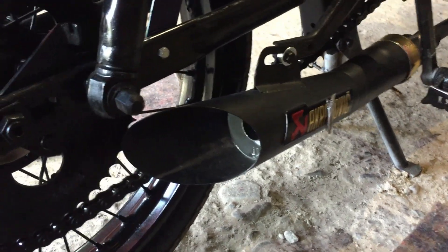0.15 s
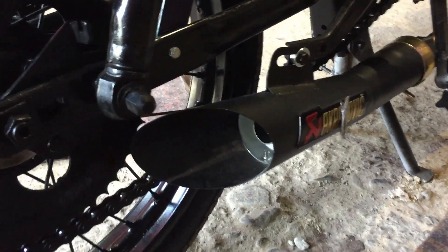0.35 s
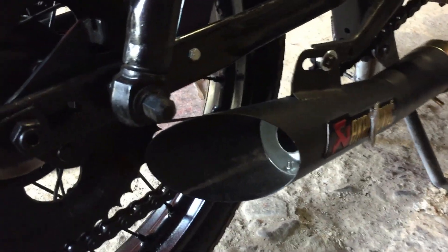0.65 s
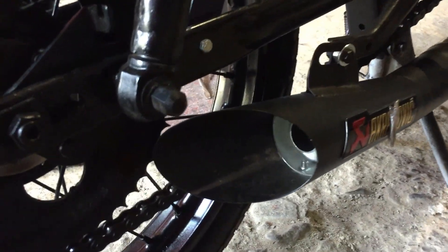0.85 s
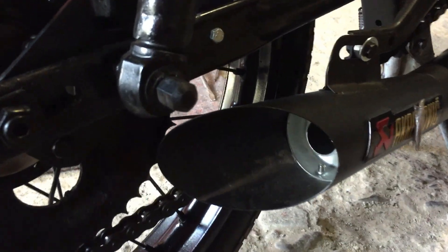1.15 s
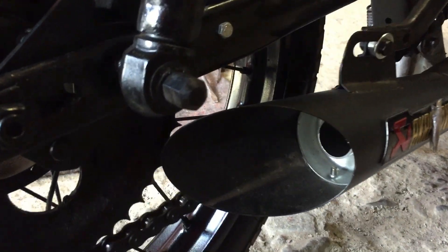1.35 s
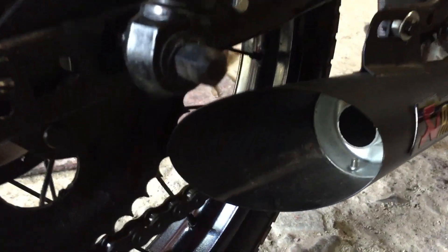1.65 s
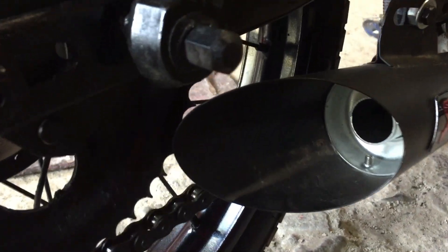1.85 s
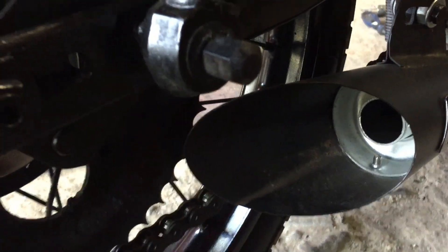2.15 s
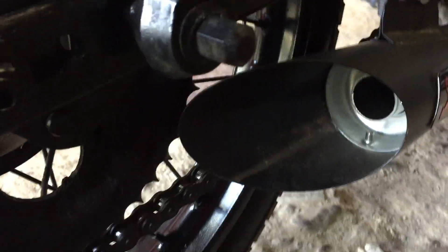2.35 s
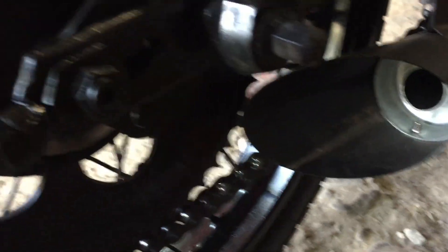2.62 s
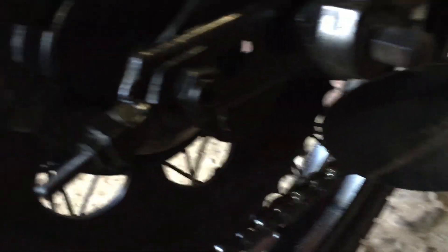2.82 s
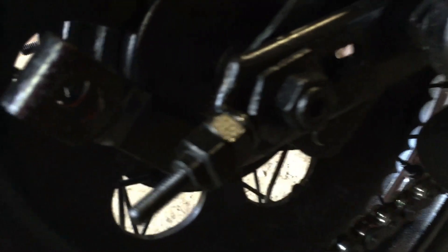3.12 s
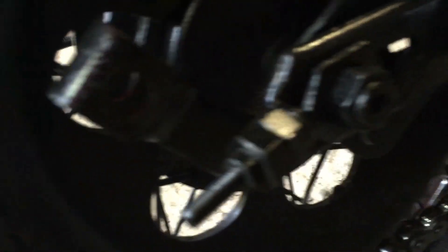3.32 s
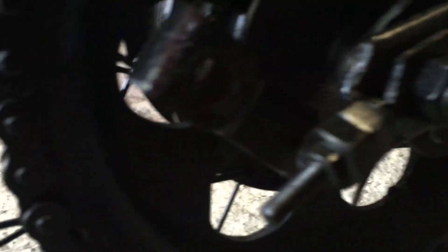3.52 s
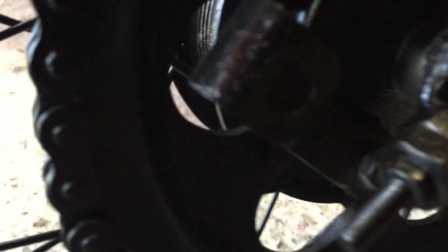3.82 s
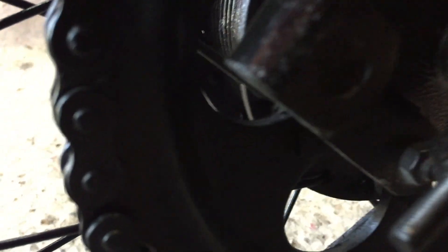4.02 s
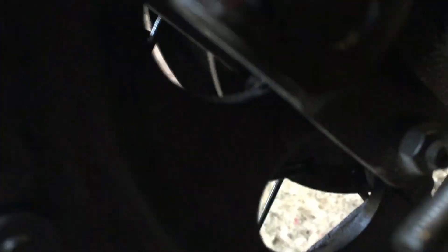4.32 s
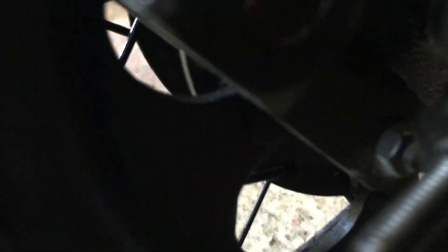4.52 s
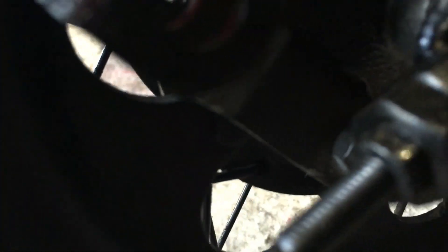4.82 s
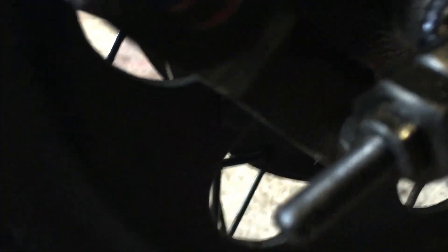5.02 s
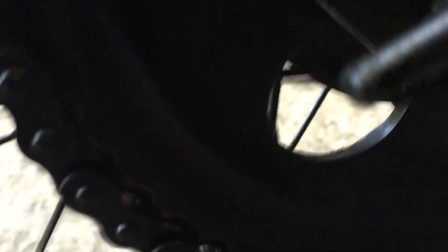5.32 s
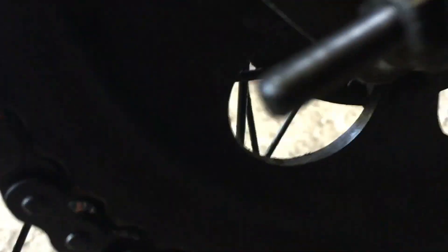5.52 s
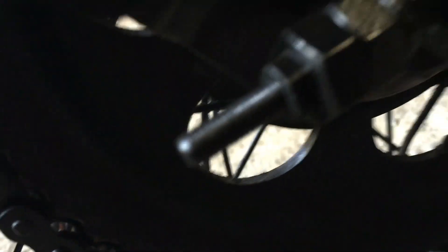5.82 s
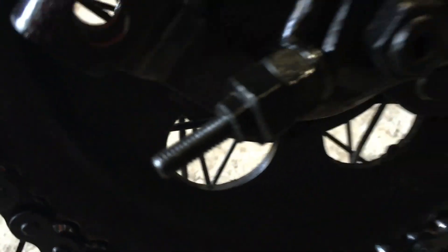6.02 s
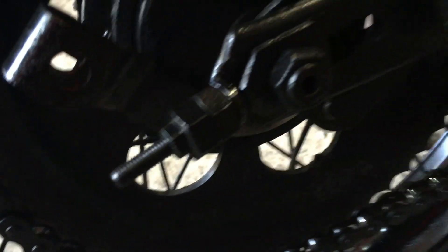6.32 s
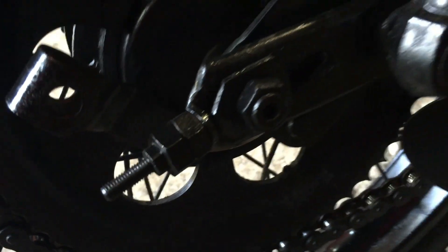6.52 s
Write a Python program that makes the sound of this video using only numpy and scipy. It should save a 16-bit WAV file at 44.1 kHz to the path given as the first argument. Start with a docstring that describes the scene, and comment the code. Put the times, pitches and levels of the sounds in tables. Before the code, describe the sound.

Close, sputtering moped idle: hard dry exhaust cracks, hollow can ring and brief gulping misses over soft gas hiss and mechanical whirr.

```python
"""Bangs and pops from a two-stroke moped idling in a garage, about 37 turns a second, over hiss and whirr.
Every few turns it misses, then catches with a bang. Each firing spits a jet from the outlet, rings the
silencer, jolts the frame and pushes out two puffs of gas; a missed turn gulps, with a faint ring and puff.
The microphone moves from the outlet past the axle to the rear sprocket and back past the axle,
and the hardest pops overload it."""
import sys
import numpy as np
from scipy import signal
from scipy.fft import rfft, irfft
from scipy.io import wavfile

SR = 44100
rng = np.random.default_rng(int(sys.argv[2]) if len(sys.argv) > 2 else 0)


def inscribe(sig):
    """Save sig as 16-bit PCM at rate SR to the path in sys.argv[1].

    A 1-D sig is mono; a 2-D sig holds one channel per row.
    Samples are clipped to [-1, 1] before scaling.
    """
    pcm = np.round(np.clip(np.atleast_2d(sig).T, -1, 1) * 32767)
    wavfile.write(sys.argv[1], SR, pcm.astype(np.int16))


N = 293706
TIME = np.arange(N) / SR  # the whole scene [s]
AGE = np.arange(2048) / SR  # time since one event [s]
BINS_HZ = abs(np.fft.fftfreq(4096, 1 / SR))
IDLE_HZ = 37
EDGE_HZ = 16250  # top of the microphone's band

# the louder bangs, most of them as the engine catches after a miss:
# (time [s], force [dB], turns missed just before [count])
BANGS = [(0.0192, -1.5, 0), (0.0726, -1.5, 0), (0.1271, -1.5, 1), (0.2109, -1.3, 2), (0.265, -1.4, 0),
         (0.318, -1.5, 0), (0.3724, -4, 1), (0.4818, -2, 2), (0.508, -1.4, 0), (0.5857, -4.5, 1),
         (0.6636, -1.5, 0), (0.715, -5, 1), (0.743, -2.2, 0), (0.8245, -1.2, 2), (1.012, -1.8, 2),
         (1.149, -1.83, 2), (1.2585, -1.5, 2), (1.3127, -1.3, 1), (1.392, -2.6, 1), (1.4716, -3, 1),
         (1.5262, -7, 1), (1.6604, -3, 2), (1.8183, -0.83, 2), (1.8998, -2, 1), (1.9791, -2.5, 1),
         (2.0866, -0.35, 2), (2.1422, -1.3, 1), (2.198, -1.5, 1), (2.2812, -3.5, 1), (2.3887, 0.4, 2),
         (2.4974, 0.46, 2), (2.5532, -1.04, 1), (2.746, -1, 2), (2.909, -3, 2), (2.9648, -4.5, 1),
         (3.0471, -1.2, 1), (3.1273, -5, 1), (3.2655, -5.5, 1), (3.2948, -1.6, 0), (3.3527, -4, 1),
         (3.4099, -0.96, 1), (3.4977, -1.5, 1), (3.6127, -2.5, 1), (3.669, -2, 1), (3.726, -1, 1),
         (3.8397, -4.5, 1), (3.9754, -2, 1), (4.0292, -2.5, 1), (4.166, -1.5, 2), (4.249, -5, 1),
         (4.3589, -2.5, 2), (4.413, -0.7, 1), (4.441, -1.1, 0), (4.7052, -3, 2), (4.8079, -2.5, 0),
         (4.8876, -2.5, 2), (4.9416, -2, 1), (5.0534, -1.04, 2), (5.1856, -1.5, 1), (5.3816, -1.5, 2),
         (5.469, -3, 2), (5.5254, -1.25, 1), (5.5818, -0.5, 1), (5.7949, -1.5, 1), (5.9026, 0.46, 2),
         (5.958, -2, 1), (6.0382, -1.24, 1), (6.093, -2.2, 1), (6.1983, -3, 1), (6.3013, -5.5, 1),
         (6.4105, -0.74, 2), (6.5175, -1, 1)]
# microphone path: (time [s], place [0 facing the outlet, 1 beside the axle, 2 at the sprocket])
MIC_PLACE = [(0, 0.057), (2.2, 0.58), (2.9, 0.75), (3.3, 1.26), (3.6, 1.45), (3.95, 1.9), (4.8, 1.78),
             (5.3, 1.82), (5.8, 1.75), (6.2, 1.04), (6.66, 0.59)]
# gain of each layer at the moving microphone: (time [s], short puffs [dB], scavenging puffs [dB],
# engine casing [dB], silencer ring [dB], gas jet [dB])
MIC_GAINS = [(0, -11.5, 0, -0.5, -1, -8.5), (.8, -3.5, -0.3, -1.5, 1.5, -3.5), (1.7, 0, -2, -11, 2, -0.5),
             (2.4, -1.5, -4.5, -17, -1, -2.5), (3.1, -2.5, -3, 1, -0.1, 2), (3.7, -0.5, -1.5, 7.5, -1, 0.5),
             (4.2, -0.5, -2, 4.5, -2, 2), (4.8, 0, -1.35, 2, 2.3, 0), (5.3, 0, -2.5, 0, -0.5, -1),
             (5.8, -1, -3.5, -12, 0.5, 1), (6.66, -2.5, -3, -2, -1.2, -0.5)]
# whirr of the moving parts: (frequency [Hz], relative level [dB])
WHIRR_COLOUR = [(20, -6), (60, 16.5), (150, 23), (300, 22.5), (500, 9.5), (900, 17.5), (1400, 6.5),
                (2500, -4), (4500, -11.5), (6500, -12), (9000, -15.5), (16000, -19)]
# resonances of engine casing and frame: (frequency [Hz], relative level [dB], t60 [s])
CASING_MODES = [(555.5, -5, 0.055), (700, -1.5, 0.04), (1093, 7, 0.072), (1478, 3, 0.071),
                (1585, -7, 0.032), (1680, -19, 0.021), (2223, -19, 0.095), (3450, -10, 0.025),
                (6700, -23, 0.022)]
# colour of the gas jet at each place: (frequency [Hz], relative level [dB])
JET_AT_OUTLET = [(1470, 2), (2500, -15), (3710, 1.5), (4050, -40), (4930, -5), (5380, -21), (6250, 3.5),
                 (7370, -19), (8110, 14.5), (8700, -22), (9570, 9.5), (10500, -7), (12100, -3),
                 (15500, -37), (16500, 10)]
JET_AT_AXLE = [(1470, -0.5), (2500, -24.5), (3140, -19), (3570, 10), (4180, -13), (5380, -6.5), (6600, 5.5),
               (8300, -17.5), (9420, -3.5), (10500, -12), (11200, 6), (11900, 9), (14100, -3), (15600, -9),
               (16500, 1.5)]
JET_AT_SPROCKET = [(1470, 4), (2500, -1.5), (3190, -21), (3480, -5), (4010, -15.5), (5380, 0), (5820, 2.5),
                   (6600, 5), (7730, -11.5), (8570, -17), (9270, -6.5), (10400, -16.5), (11100, -13.5),
                   (15100, -6), (16500, -32)]
# ring of the silencer: (frequency [Hz], level at the outlet [dB], beside the axle [dB],
# at the sprocket [dB], growth with force [dB per dB])
SILENCER_RING = [(280, -17, -38, -36, -7), (370, -52, -38, -44, -1.45), (440, -24, -18.5, -22, -1.24),
                 (735, -5, -2.5, -4.5, 0.76), (835, -7.5, -4, -9.5, 1.48), (889, 3, -1.5, 1, 1.5),
                 (1083, -7, -4.5, -5.5, 2.12), (1231, -10.5, -10, -10.5, 1.36),
                 (1326, -35, -36.5, -38, 3.5), (1603, -24.5, -14, -16, 1.02), (2046, -38, -34, -36, 3.8),
                 (2175, -21.5, -22.5, -18, 3), (2820, -58, -54, -52, 5.5), (4260, -39.5, -49.5, -53, 1)]
# how the exhaust chamber passes the puffs: (frequency [Hz], gain [dB])
CHAMBER_GAIN = [(20, -51), (40, -33), (72, -10.5), (105, -8), (150, -1), (180, -3.5), (218, 3), (265, 0.5),
                (330, 5), (450, -1), (800, 3)]
# garage reverberation: (frequency [Hz], t60 [s])
GARAGE_DECAY = [(100, 1), (1000, 0.077), (4000, 0.49), (14000, 0.14)]


def amp(db):
    """Decibels to gain."""
    return 10 ** (np.asarray(db) / 20)


def unit(x):
    """Scales to rms 1."""
    return x / np.sqrt(np.mean(x ** 2) + 1e-20)


def at(curve, s, axis=1):
    """Reads one column of a curve at times s."""
    rows = np.array(curve)
    return np.interp(s, rows[:, 0], rows[:, axis])


def read(points, hz):
    """Reads a spectrum on a log-frequency axis."""
    f, value = np.transpose(points)
    return np.interp(np.log(hz + 1), np.log(f + 1), value)


def add(mix, s, sound):
    """Mixes a sound in at time s."""
    part = mix[max(round(s * SR), 0):][:len(sound)]
    part += sound[:len(part)]


def causal(db):
    """Impulse response that starts at once, with gain db on BINS_HZ, floored at -70 dB."""
    log_gain = np.log(amp(np.maximum(db, -70)))
    minimum_phase = np.exp(np.conj(signal.hilbert(log_gain)))
    return np.fft.ifft(minimum_phase).real[:len(AGE)]


def colour(points):
    """Impulse response of energy 1 with the given spectrum."""
    response = causal(read(points, BINS_HZ))
    return response / np.linalg.norm(response)


def through(x, response):
    """Filters x and keeps its length."""
    return signal.fftconvolve(x, response)[:len(x)]


def heard_at(spectra, s):
    """Blends the dB spectra of the places next to the microphone."""
    place = np.clip(at(MIC_PLACE, s), 0, 2)
    return sum(max(1 - abs(place - k), 0) * db for k, db in enumerate(spectra))


def firings(settled_db=-4.0, sputter_db=-11.0):
    """Pops (time, force) and times of missed turns: the crank turns almost evenly from bang to bang."""
    fouling, scatter_db, jitter_s = .25, 1.6, .00015
    sputter_chance, mild_db = .55, -1.3
    pops, misses = [], []
    running_on = (BANGS[-1][0] + 1, 0, 0)
    for (s, force_db, _), (next_s, next_db, missed) in zip(BANGS, BANGS[1:] + [running_on]):
        turn_count = round((next_s - s) * IDLE_HZ)
        turns = np.linspace(s, next_s, turn_count, endpoint=False)
        burning = len(turns) - round(missed)
        pops.append((s, force_db))
        for turn_s in turns[1:burning]:
            luck = 2 - rng.gamma(4) / 2  # skewed towards the odd very weak pop
            # a hard burn leaves spent gas that weakens the next
            force_db = settled_db - fouling * (force_db - settled_db) + scatter_db * luck
            pops.append((turn_s + jitter_s * rng.normal(), force_db))
        for turn_s in turns[burning:]:
            chance, luck = rng.random(), rng.normal()
            # the turn before a milder bang may sputter
            if chance < sputter_chance and turn_s == turns[-1] and next_db < mild_db:
                pops.append((turn_s, sputter_db + scatter_db * luck))
            else:
                misses.append(turn_s)
    return pops, misses


def outflow(pops, level_db=-47.0, shaded_db=-6, surge=3, surge_s=0.0083, spread_s=0.0047):
    """Gas keeps hissing from the outlet, surging after each pop; the wheel shades it from the side."""
    flow = np.ones(N)
    swell = np.exp(-((AGE - surge_s) / spread_s) ** 2 / 2)
    for s, force_db in pops:
        add(flow, s, surge * amp(force_db) * swell)
    hiss_colour = colour([(700, -33), (1500, 6), (2400, 8.5), (3600, 1.5), (5000, -8.5), (12000, -18.5)])
    hiss = through(rng.standard_normal(N), hiss_colour)
    return amp(level_db + shaded_db * at(MIC_PLACE, TIME)) * flow * hiss


def mechanism(pops, misses, knock_db=-38, slap_s=.021, slap_db=-9, burn_s=0.001174,
              whirr_db=-31.5, throb=1.0):
    """Firings knock the casing and the piston slaps it late in each turn, over a swelling bearing whirr."""
    rattle, spread_db = .028, 3
    knocks, swell = np.zeros(N), np.zeros(N)
    for s in [s for s, _ in pops] + misses:
        blow = amp(spread_db * rng.normal()) * np.exp(-AGE / 0.011)
        add(swell, s + slap_s, blow)
        add(knocks, s + slap_s, amp(slap_db) * blow[:1])  # one sample: a click
    for s, _ in pops:
        add(knocks, s + burn_s, amp(spread_db * rng.standard_normal(1)))
    casing = sum(amp(db - 60 * AGE / t60) * np.sin(2 * np.pi * hz * AGE) for hz, db, t60 in CASING_MODES)
    struck = knocks + rattle * swell * rng.standard_normal(N)
    clatter = unit(through(struck, casing))
    throbbing_noise = (1 + throb * swell) * rng.standard_normal(N)
    whirr = unit(through(throbbing_noise, colour(WHIRR_COLOUR)))
    return amp(knock_db + at(MIC_GAINS, TIME, axis=3)) * clatter + amp(whirr_db) * whirr


def spit(s, force_db, growth=2.1):
    """Level of the gas jet in dB: it grows much faster than the force of the firing."""
    usual_db = -3
    return at(MIC_GAINS, s, axis=5) + growth * (force_db - usual_db)


def jet(pops, level_db=-20.0, hold_s=0.0037, crack=5.3, wake_db=-17, wake_s=0.0045):
    """A small shock leaves the outlet, followed by a few milliseconds of tearing gas."""
    places = [read(p, BINS_HZ) for p in (JET_AT_OUTLET, JET_AT_AXLE, JET_AT_SPROCKET)]
    shape = np.exp(-(AGE / hold_s) ** 2) + amp(wake_db) * np.exp(-AGE / wake_s)
    uneven_db, bands_hz = 2.0, (2000, 3500, 5000, 6500, 9000, 12000, 14000, 16000)
    out = np.zeros(N)
    for s, force_db in pops:
        # every jet tears with its own colour
        tearing_db = read([(hz, uneven_db * rng.normal()) for hz in bands_hz], BINS_HZ)
        burst = shape * rng.standard_normal(len(AGE))
        burst[0] += crack
        outlet = causal(heard_at(places, s) + tearing_db)
        outlet /= np.linalg.norm(outlet)
        add(out, s, amp(level_db + spit(s, force_db)) * through(burst, outlet))
    return out


def silencer(pops, misses, level_db=30.0, wake_s=0.0053, front_s=0.001071, coast_force_db=-23):
    """A pressure front with a turbulent wake rings the can; hard firings are steeper, so brighter."""
    turbulence, uneven_db = .028, 1.6
    *places, growth = [read([(row[0], row[k]) for row in SILENCER_RING], BINS_HZ) for k in range(1, 5)]
    growth = np.maximum(growth, .7)  # every resonance gains at least 0.7 dB per dB of force
    out = np.zeros(N)
    blows = pops + [(s, coast_force_db) for s in misses]
    for s, force_db in blows:
        drive = turbulence * rng.standard_normal(len(AGE)) * np.exp(-AGE / wake_s)
        drive[0] = -1  # the front itself
        # no two charges burn alike, so the upper resonances are struck unevenly
        strikes = [(row[0], uneven_db * rng.normal() * (row[0] > 1000)) for row in SILENCER_RING]
        burn_db = read(strikes, BINS_HZ)
        ring = causal(heard_at(places, s) + growth * (force_db + 4.0) + burn_db)
        add(out, s + front_s, amp(level_db + at(MIC_GAINS, s, axis=4)) * through(drive, ring))
    return out


def tailpipe(x, hz=945, shaded_db=-4):
    """The outlet tube holds one note from pop to pop, clearest from straight behind it."""
    width_hz, gain = 36, 1.1
    t = np.arange(SR // 5) / SR
    decay = 2 * np.pi * width_hz / SR * np.exp(-np.pi * width_hz * t)
    note = decay * np.cos(2 * np.pi * hz * t)
    return x + gain * amp(shaded_db * at(MIC_PLACE, TIME)) * through(x, note)


def rear_frame(pops, level_db=-19, hz=1620, t60=0.012, delay_s=0.001512, per_force=0.42):
    """Each firing jolts the rear frame into a short knock, heard where the engine's casing is."""
    uneven_db = 1.5
    knock = amp(-60 * AGE / t60) * np.sin(2 * np.pi * hz * AGE)
    out = np.zeros(N)
    for s, force_db in pops:
        add(out, s + delay_s, amp(per_force * force_db + uneven_db * rng.normal()) * knock)
    return amp(level_db + at(MIC_GAINS, TIME, axis=3)) * out


def bark(pops, level_db=-11, hz=1260, centre_s=0.002465, per_force=4.2):
    """The can overdriven into a short, higher bark, growing so steeply that the hardest firings dominate."""
    length_s, per_spit = .0011, .9
    swell = np.exp(-((AGE - centre_s) / length_s) ** 2 / 2)
    burst = swell * np.sin(2 * np.pi * hz * (AGE - centre_s))
    out = np.zeros(N)
    for s, force_db in pops:
        add(out, s, amp(level_db + per_force * force_db + per_spit * spit(s, force_db)) * burst)
    return out


def puff(centre_s, open_s, close_s):
    """Pressure from a swell of gas flow: its slope, positive as it grows and negative as it stops."""
    width = np.where(AGE < centre_s, open_s, close_s)
    u = (AGE - centre_s) / width
    return -u * np.exp((1 - u ** 2) / 2) * close_s / width


def gas_flow(pops, misses, blowdown_db=-4, scavenge_db=-1.0, backflow_db=-19, gulp_db=-12, coast_db=-14):
    """Slight backflow, blowdown, then a slower scavenging puff; a missed turn sucks gas back, then puffs."""
    fast, slow = np.zeros(N), np.zeros(N)
    for s, force_db in pops:
        blowdown = puff(0.00472 + .00008 * force_db, 0.00095, 0.00097)
        add(fast, s, amp(blowdown_db + 0.92 * force_db) * blowdown)
        add(fast, s, -amp(backflow_db) * puff(0.00308, 0.00078, 0.00075))
        add(slow, s, amp(scavenge_db + 0.38 * (force_db + 1)) * puff(0.01288, 0.0022, 0.0018))
    for s in misses:
        gulp = -amp(gulp_db + rng.normal()) * puff(.0043, .0009, .0012)
        add(fast, s, gulp)
        add(slow, s, amp(coast_db) * puff(0.01326, 0.00091, 0.0016))
    flow = fast * amp(at(MIC_GAINS, TIME, axis=1)) + slow * amp(at(MIC_GAINS, TIME, axis=2))
    chamber = amp(read(CHAMBER_GAIN, np.fft.rfftfreq(N, 1 / SR)))
    return irfft(rfft(flow) * chamber, N)


def garage(x, size=16384):
    """Sparse wall reflections, each band of the tail dying at its own rate."""
    t = np.arange(size) / SR
    # about 2500 reflections a second, the first after 6 ms
    taps = rng.choice([-1., 1.], size) * (rng.random(size) < 2500 / SR) * (t > .006)
    hz, age, z = signal.stft(taps, SR, nperseg=256)
    decay = amp(-60 * age / read(GARAGE_DECAY, hz)[:, None])
    tail = signal.istft(z * decay, SR, nperseg=256)[1]
    return through(x, tail / np.linalg.norm(tail))


def scene():
    """The exhaust, the engine and frame, and a faint room fed by the exhaust."""
    pops, misses = firings()
    hiss = outflow(pops)
    engine = mechanism(pops, misses)
    gas = jet(pops)
    ring = tailpipe(silencer(pops, misses)) + bark(pops)
    frame = rear_frame(pops)
    puffs = gas_flow(pops, misses)
    room = garage(amp(-22.5) * puffs + amp(-16.0) * ring + amp(-22.0) * gas)
    return (puffs + ring + gas + hiss + engine + frame + room)[None]


def record(dry):
    """The microphone rounds off the hardest pops below full scale; then the band limit."""
    rounded = dry / (1 + dry ** 6) ** (1 / 6)
    band_limit = signal.firwin(255, EDGE_HZ, window=("kaiser", 9), fs=SR)
    return signal.oaconvolve(rounded, band_limit[None], "same")


dry = scene()
out = record(dry)
inscribe(out)
```